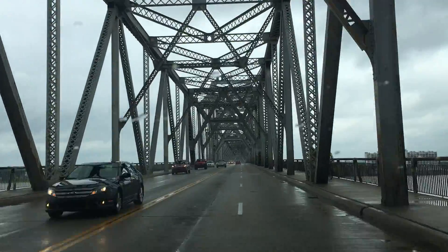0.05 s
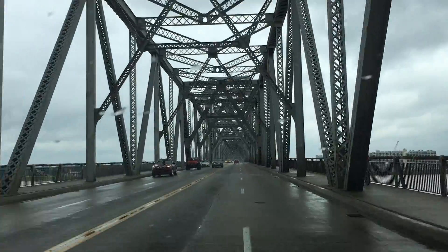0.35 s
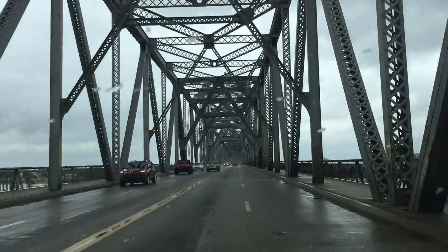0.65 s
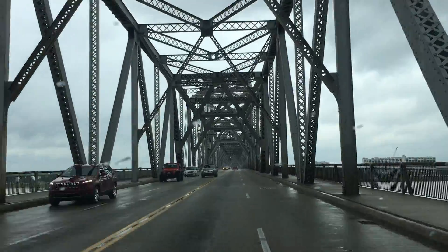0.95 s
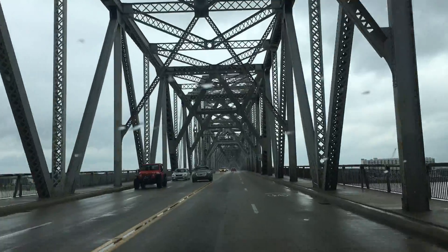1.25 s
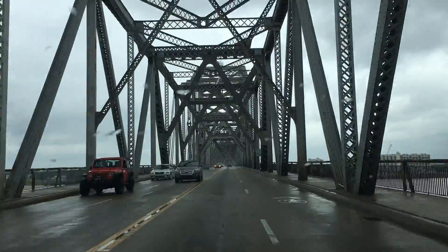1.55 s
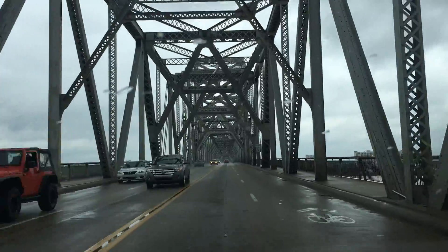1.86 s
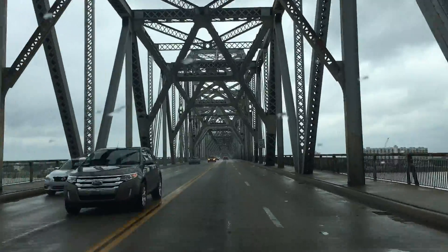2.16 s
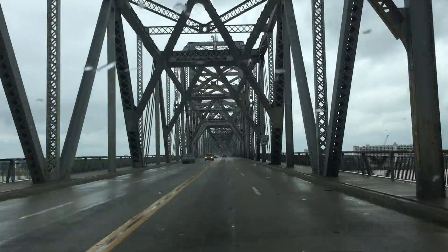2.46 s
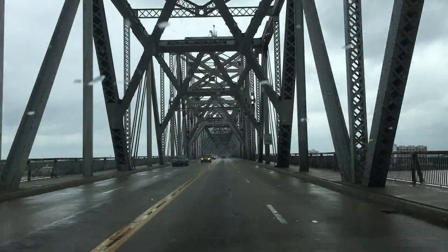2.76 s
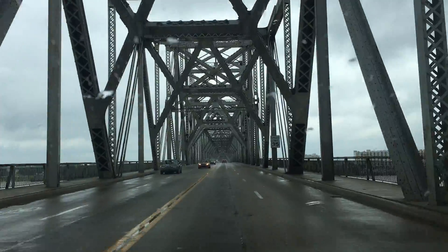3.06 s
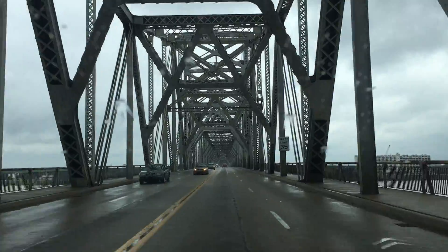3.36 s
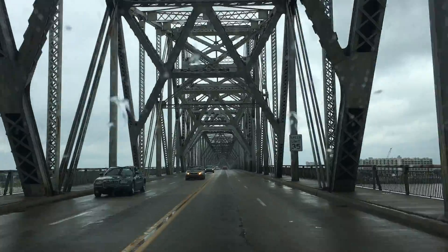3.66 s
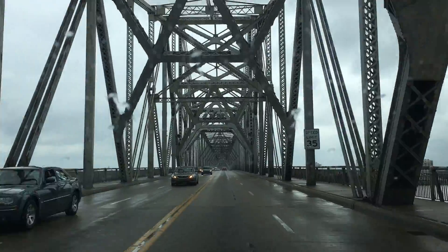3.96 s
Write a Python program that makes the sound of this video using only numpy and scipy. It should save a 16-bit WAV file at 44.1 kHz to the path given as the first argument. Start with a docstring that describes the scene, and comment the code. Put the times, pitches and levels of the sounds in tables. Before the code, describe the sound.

Deep road rumble fills a car crossing a wet bridge, heard from the cabin with windows closed. The engine drones underneath, trim ticks faintly near the start, then soft thumps come through the floor as oncoming cars swish faintly past.

```python
"""Car crossing a wet steel bridge

One microphone in the cabin, windows closed. Close all round, the tyres drive a deep rumble and a soft
roar, the engine drones underneath, and uneven spots in the deck thump through the body. Farther off,
oncoming cars swish past behind the glass; nearby, the trim and drops on the windscreen tick faintly."""
import sys
import numpy as np
from scipy import signal
from scipy.fft import rfft, irfft
from scipy.io import wavfile
from scipy.ndimage import uniform_filter1d

SR = 44100
rng = np.random.default_rng(int(sys.argv[2]) if len(sys.argv) > 2 else 0)


def store_pcm(level_fs):
    """Save levels as 16-bit WAV."""
    pcm = np.round(np.clip(level_fs, -1, 1) * 32767).astype(np.int16)
    wavfile.write(sys.argv[1], SR, np.atleast_2d(pcm).T)


N = 176400
TIME = np.arange(N) / SR

# cabin rumble (frequency [Hz], relative density [dB])
RUMBLE_SPECTRUM = [(15, -39), (25, -23), (32, -5), (42, 2), (54, -1), (64, -1.5), (77, 2), (94, -0.5),
                   (112, -0.5), (130, -3), (150, -11), (185, -28), (300, -45), (1500, -110)]
# (time [s], level [dB])
RUMBLE_LEVELS = [(0, -23), (.45, -21.5), (.62, -26.5), (.8, -21.5), (1.3, -22), (1.48, -23.5),
                 (1.72, -22.5), (2.1, -24.5), (2.35, -25), (2.55, -22.5), (2.72, -29.5), (2.93, -18.5),
                 (3.15, -21), (3.52, -22), (3.65, -22.5), (4, -23)]
# drone of the body panels (frequency [Hz], relative density [dB])
PANEL_SPECTRUM = [(40, -47), (120, -12), (160, -0.5), (185, -1), (205, 2), (222, 1), (250, -5), (310, -10),
                  (450, -22), (800, -43.5), (2500, -96.5)]
# (time [s], level [dB])
PANEL_LEVELS = [(0, -40), (.6, -39), (.85, -35), (1.1, -38), (1.45, -37.5), (1.8, -36), (2.08, -39.5),
                (2.27, -35), (2.38, -39), (2.8, -33.5), (3.07, -38), (3.3, -37), (3.62, -41), (3.87, -35),
                (4, -35.5)]
# tyre roar through closed windows (frequency [Hz], relative density [dB])
ROAR_SPECTRUM = [(30, -31.5), (150, -19), (300, 5), (420, 4), (550, 1), (700, -3.5), (900, -3),
                 (1100, -5.5), (1350, -7.5), (1480, -10.5), (1750, -11.5), (2000, -15), (2400, -18.5),
                 (3200, -21), (4200, -25.5), (4950, -30), (5600, -25.5), (6500, -30), (7500, -40),
                 (11000, -57.5)]
# (time [s], level [dB])
ROAR_LEVELS = [(0, -47), (.8, -49), (1.6, -49.5), (2.4, -49), (2.8, -48.5), (3.1, -50.5), (3.6, -51),
               (4, -48.5)]
# tyre resonances (frequency [Hz], width [Hz], level [dB])
TREAD_MODES = [(986, 20, -62.5), (900, 48, -65), (1657, 44, -67.5), (1327, 57, -76.5)]
# engine, duller as the load eases (time [s], firing rate [Hz], level [dB], tilt [dB per order])
ENGINE_RUN = [(0, 53.22, -26, -0.5), (.5, 53.38, -26.5, .5), (.9, 54.02, -28.5, .5),
              (1.4, 54.18, -30.5, 0.5), (2, 55.26, -29.5, -2.5), (2.7, 54.35, -33.5, -2),
              (3.3, 54.53, -31, -2), (4, 54.8, -30, -2)]
# engine harmonics (multiple of the firing rate, gain [dB])
FIRING_ORDERS = [(1, -0.5), (2, 0), (3, -10.5), (4, -28.5)]
# uneven spots in the deck (time [s], boom [dB], knock [dB], tyre slap [dB])
DECK_BUMPS = [(0.753, -29.5, -26.5, -41), (1.355, -17.5, -35, -58), (1.681, -25.5, -35, -54),
              (2.214, -28, -26, -54), (2.782, -38, -29.5, -46.5), (3.478, -22.5, -39, -63),
              (3.829, -27, -31, -46)]
# suspension and cabin air (frequency [Hz], gain [dB], t60 [s])
CABIN_MODES = [(51.8, 4.5, 0.46), (84.6, 7.5, 0.29), (105.3, 2.5, 0.16)]
# body panels (frequency [Hz], gain [dB], t60 [s])
PANEL_MODES = [(162.5, 4, 0.14), (215.92, -1.5, 0.2), (274, -9, 0.089), (380, -13, 0.14),
               (554, -19.5, 0.042)]
# tyre slap (frequency [Hz], relative density [dB])
SLAP_SPECTRUM = [(100, -20), (300, 1), (550, -0.5), (900, -10), (1500, -24.5), (6000, -58)]
# oncoming cars (time abreast of the microphone [s], spray level [dB], fall to half amplitude [s])
PASSING_CARS = [(0.103, -66, .17), (0.367, -66, .15), (0.755, -65.5, 0.13), (1.252, -69, 0.28),
                (2.536, -66, 0.18), (2.712, -62, 0.12)]
# their spray behind the glass (frequency [Hz], relative density [dB])
SPRAY_SPECTRUM = [(100, -42), (700, -12), (1600, -1.5), (2400, -1), (3300, -2.5), (4300, 1), (4950, -6),
                  (5600, -6.5), (6600, -5), (7500, -11), (9200, -12), (10500, -25.5), (16000, -38.5)]
# splits between four spray bands (frequency [Hz])
SPRAY_SPLITS = [3000, 5000, 6600]
# how early each band peaks, low to high (lead [s])
SPRAY_LEADS = [.04, 0.0011, 0.12, 0.24]
# ticks in the trim (time [s], level [dB])
TRIM_TICKS = [(0.2427, -40.5), (0.2559, -46), (.264, -53), (.321, -54), (.344, -54), (.373, -47),
              (0.383, -55), (1.071, -56)]
# ringing of the plastic (frequency [Hz], gain [dB], t60 [s])
PLASTIC_MODES = [(1510, -9.5, 0.0051), (1890, 4, 0.005), (2370, -4, 0.011), (2780, -7, 0.014),
                 (7200, -15.5, 0.0054)]
# drops on the windscreen (time [s], level [dB])
GLASS_DROPS = [(.755, -61.5), (1.3566, -50)]
# their splash (frequency [Hz], relative density [dB])
SPLASH_SPECTRUM = [(3000, -18), (5200, -13.5), (6200, -2), (8300, 1), (10500, -9), (12000, -6), (16000, -5)]
# background hiss (frequency [Hz], relative density [dB])
HISS_SPECTRUM = [(2000, -6), (9500, -2.5), (10500, -5.5), (11500, -3.5), (15500, -4)]


def cabin_rumble():
    """Road texture shakes the cabin and its panels all round the microphone."""
    rumble = steadied(noise(RUMBLE_SPECTRUM), window_s=0.095) * from_db(in_time(RUMBLE_LEVELS)[0])
    panels = steadied(noise(PANEL_SPECTRUM), window_s=0.21) * from_db(in_time(PANEL_LEVELS)[0])
    return rumble + panels


def tyres():
    """Just outside the closed windows, the treads roar and sing faintly."""
    flutter_db = 0.32 * drift(rate_hz=17)
    out = noise(ROAR_SPECTRUM) * from_db(in_time(ROAR_LEVELS)[0] + flutter_db)
    for hz, width, db in TREAD_MODES:
        singing = ring(rng.standard_normal(N), hz, t60=np.log(1000) / (np.pi * width))
        out += from_db(db) * rms_one(butter(singing, hz, "low"))
    return out


def engine(waver_db=1.52, pitch_wander=0.0052):
    """The low firing orders drone into the cabin, each wavering a little."""
    hz, db, tilt = in_time(ENGINE_RUN)
    firing_hz = hz * (1 + pitch_wander * drift(rate_hz=2.86))
    phase = 2 * np.pi * np.cumsum(firing_hz) / SR
    out = 0
    for order, order_db in FIRING_ORDERS:
        level = from_db(db + order_db + tilt * (order - 1) + waver_db * drift(rate_hz=4.1))
        out += np.sqrt(2) * level * np.sin(order * phase + 2 * np.pi * rng.random())
    return out


def deck_bumps(contact_hz=600):
    """Below the floor the tyres slap an uneven spot; the cabin booms and the panels knock."""
    s, boom_db, knock_db, slap_db = np.transpose(DECK_BUMPS)
    boom = strike(s, boom_db, CABIN_MODES, vary_db=3)
    knock = strike(s, knock_db, PANEL_MODES, vary_db=0)
    body = butter(boom + knock, contact_hz, "low", order=4)
    slap = noise(SLAP_SPECTRUM) * bursts(s, slap_db, decay_s=0.025)
    return butter(body, 20, "high") + slap


def oncoming_cars():
    """Tyre spray swells and fades with distance, brightest as each car nears the microphone."""
    out = 0
    for k, lead in enumerate(SPRAY_LEADS):
        band = noise(SPRAY_SPECTRUM)
        if k > 0:
            band = butter(band, SPRAY_SPLITS[k - 1], "high", order=6)
        if k < len(SPRAY_SPLITS):
            band = butter(band, SPRAY_SPLITS[k], "low", order=6)
        swells = [from_db(db) / (1 + ((TIME + lead - s) / half) ** 2) for s, db, half in PASSING_CARS]
        out += band * np.sqrt(sum(swell ** 2 for swell in swells))  # the cars add in power
    return out


def trim_ticks():
    """Plastic trim near the microphone ticks and rings briefly."""
    return strike(*np.transpose(TRIM_TICKS), PLASTIC_MODES, vary_db=2)


def windscreen_drops():
    """Drops burst on the outside of the glass."""
    return noise(SPLASH_SPECTRUM) * bursts(*np.transpose(GLASS_DROPS), decay_s=0.0036)


def hiss(level_db=-74.5, lift_db=6.5, lift_start_s=0.925, lift_end_s=1.785):
    """A thin hiss behind everything lifts briefly."""
    lifted = (TIME > lift_start_s) & (TIME < lift_end_s)
    return noise(HISS_SPECTRUM) * from_db(level_db + lift_db * lifted)


def from_db(db):
    return 10 ** (np.asarray(db) / 20)


def rms_one(x):
    return x / np.sqrt(np.mean(x ** 2) + 1e-20)


def in_time(rows):
    """Each column of a curve, at every sample."""
    s, *columns = np.transpose(rows)
    return [np.interp(TIME, s, column) for column in columns]


def drift(rate_hz):
    """Slow random wandering with spread 1."""
    hop, settle = 40, 2000
    pole = np.exp(-2 * np.pi * rate_hz * hop / SR)
    white = rng.standard_normal(N // hop + settle + 2)
    slow = signal.lfilter([1], [1, -2 * pole, pole * pole], white)[settle:]
    return np.interp(np.arange(N) / hop, np.arange(len(slow)), rms_one(slow))


def noise(spectrum):
    """Noise of the given colour, rms 1."""
    hz, db = np.transpose(spectrum)
    bins = np.maximum(np.arange(N // 2 + 1) * SR / N, 1)
    gain = from_db(np.interp(np.log(bins), np.log(hz), db))
    return rms_one(irfft(rfft(rng.standard_normal(N)) * gain, N))


def steadied(x, window_s):
    """Noise with its chance swells evened out."""
    return x / np.sqrt(uniform_filter1d(x ** 2, int(window_s * SR)) + 1e-12)


def butter(x, hz, kind, order=2):
    return signal.sosfilt(signal.butter(order, hz, kind, fs=SR, output="sos"), x)


def ring(x, hz, t60):
    """A unit click sets a sine of height 1 ringing."""
    r, w = np.exp(-np.log(1000) / (t60 * SR)), 2 * np.pi * hz / SR
    return signal.lfilter([0, np.sin(w)], [1, -2 * r * np.cos(w), r * r], x + 1e-18)


def clicks(s, db):
    """One impulse per event."""
    out = np.zeros(N)
    out[(np.asarray(s) * SR).astype(int)] = from_db(db)
    return out


def strike(s, db, modes, vary_db):
    """Every blow rings each mode, its strength scattered by vary_db."""
    out = 0
    for k, (hz, mode_db, t60) in enumerate(modes):
        blows = clicks(s, db + mode_db + vary_db * rng.standard_normal(len(s)))
        out += (-1) ** k * ring(blows, hz, t60)
    return out


def bursts(s, db, decay_s):
    """An envelope that jumps at each event and dies away."""
    return signal.lfilter([1], [1, -np.exp(-1 / (decay_s * SR))], clicks(s, db) + 1e-18)


def scene():
    """Everything that reaches the microphone in the cabin, in mono."""
    car = cabin_rumble() + tyres() + engine() + deck_bumps()
    return (car + oncoming_cars() + trim_ticks() + windscreen_drops() + hiss())[None]


def record(dry, cutoff_hz=15760):
    """The top of the microphone's range is cut steeply."""
    return signal.sosfilt(signal.ellip(12, .1, 80, cutoff_hz, fs=SR, output="sos"), dry)


dry = scene()
out = record(dry)
store_pcm(out)
```